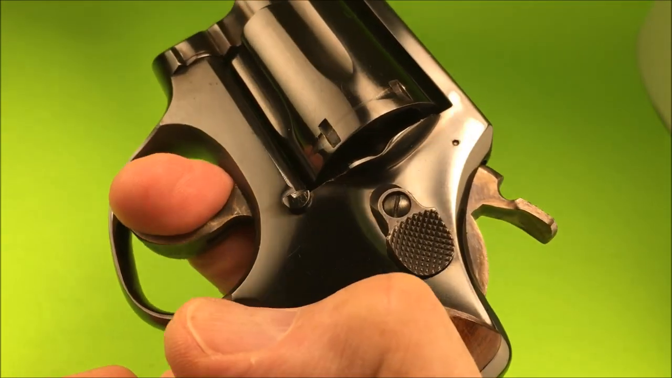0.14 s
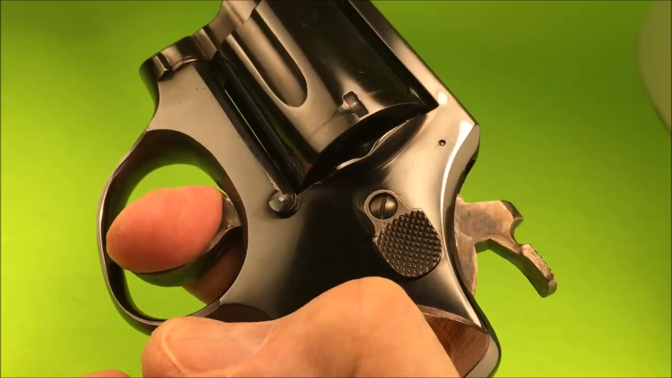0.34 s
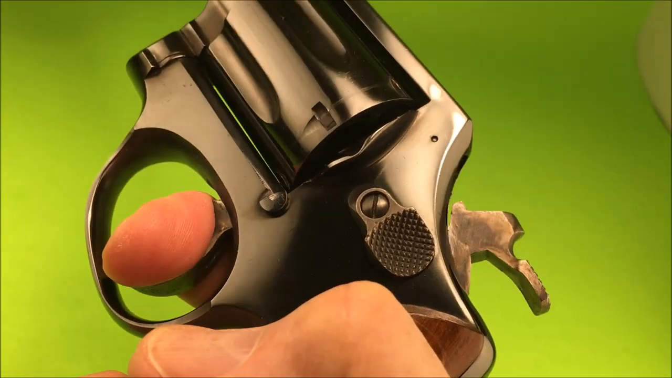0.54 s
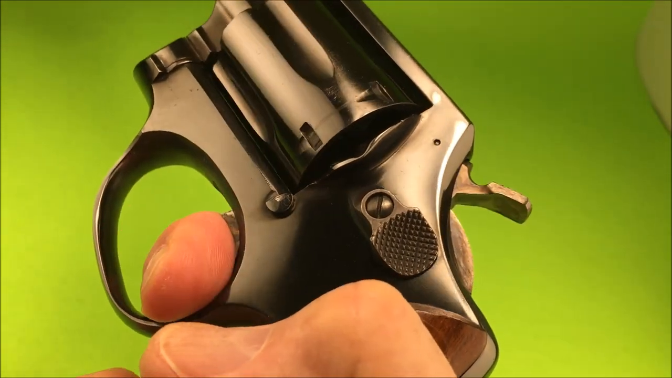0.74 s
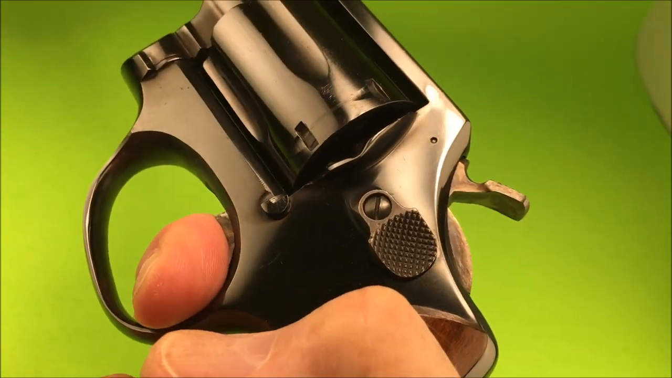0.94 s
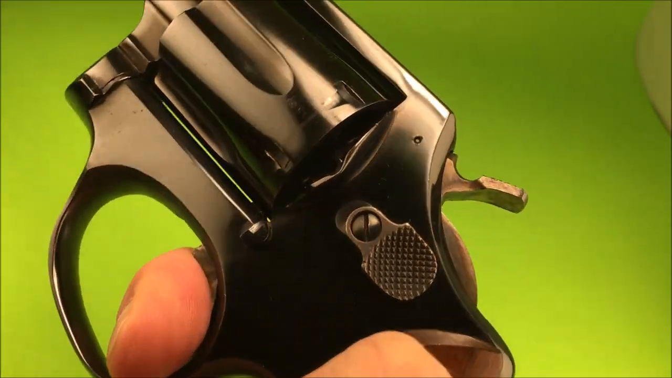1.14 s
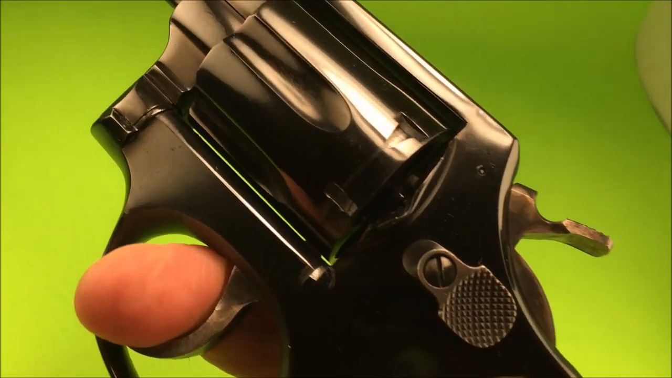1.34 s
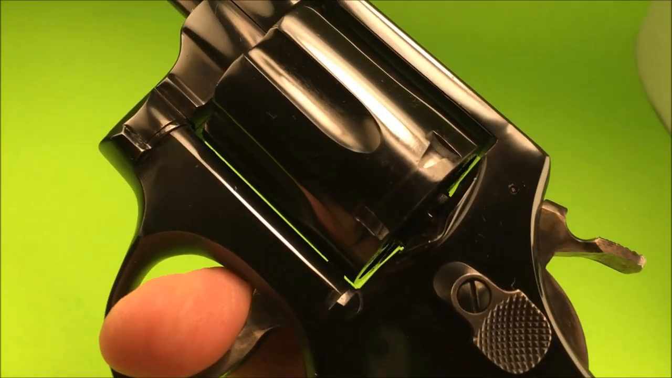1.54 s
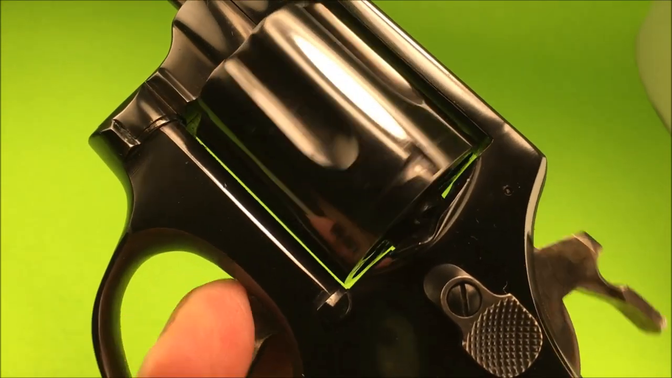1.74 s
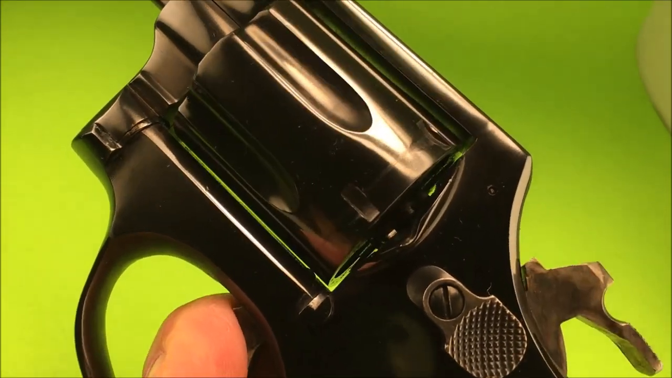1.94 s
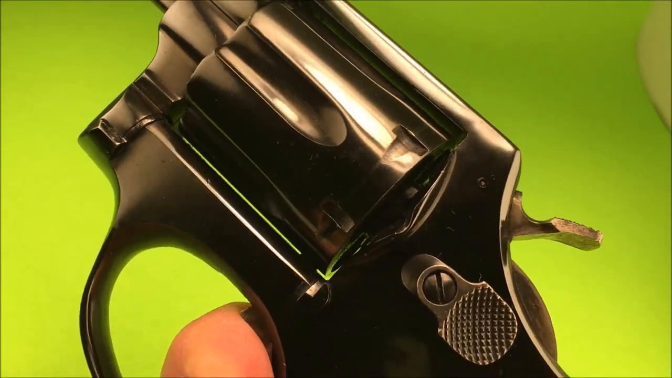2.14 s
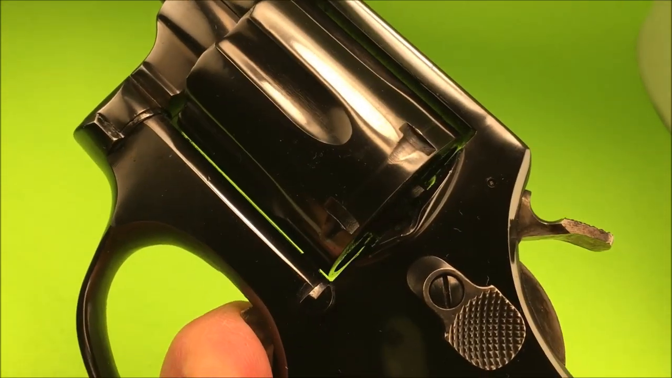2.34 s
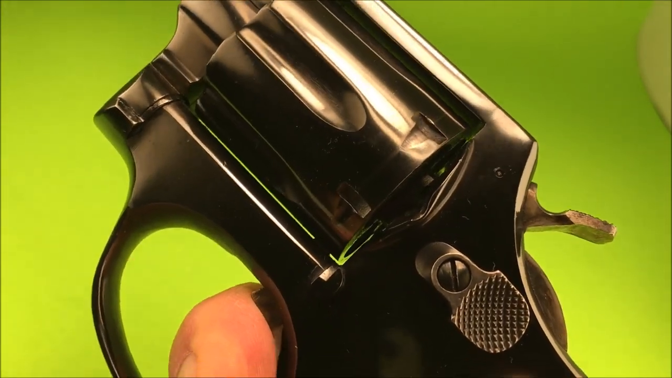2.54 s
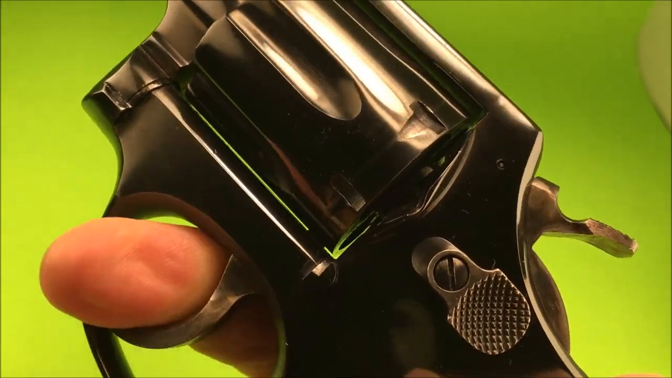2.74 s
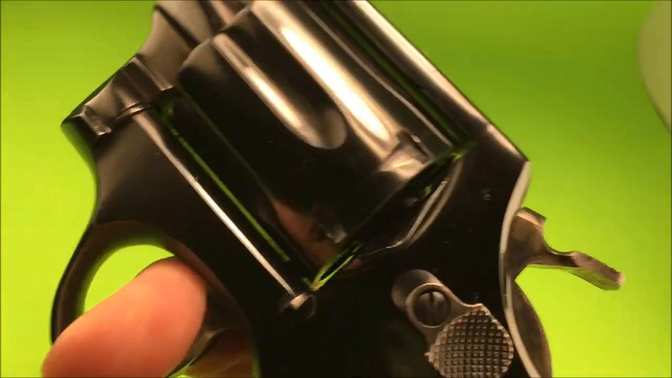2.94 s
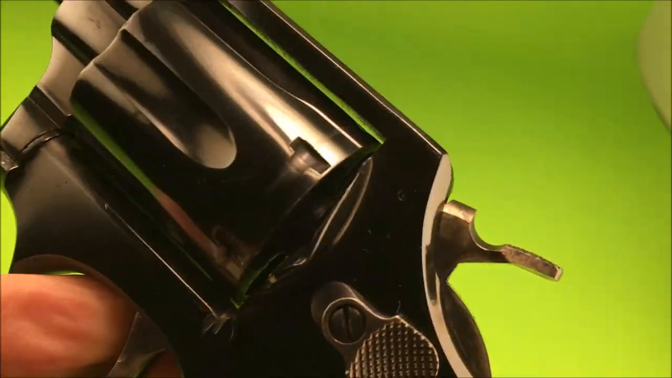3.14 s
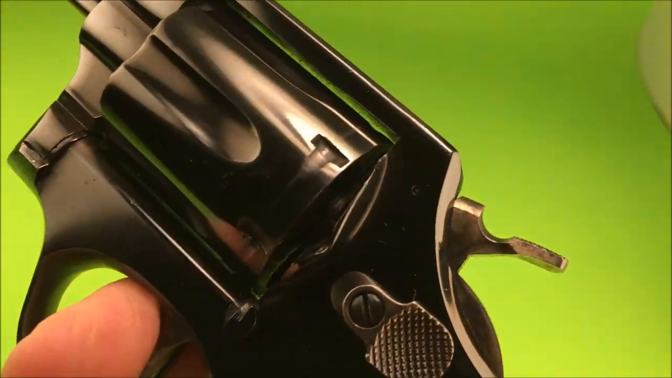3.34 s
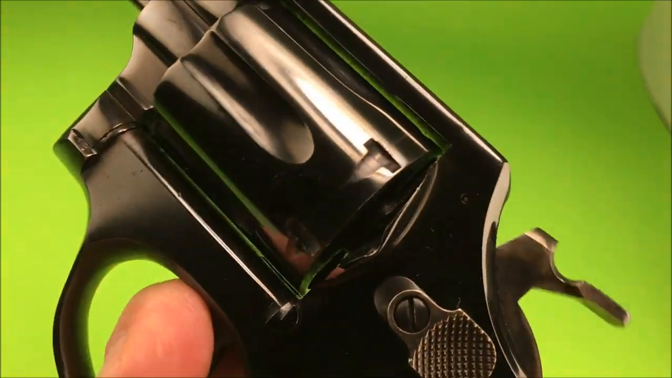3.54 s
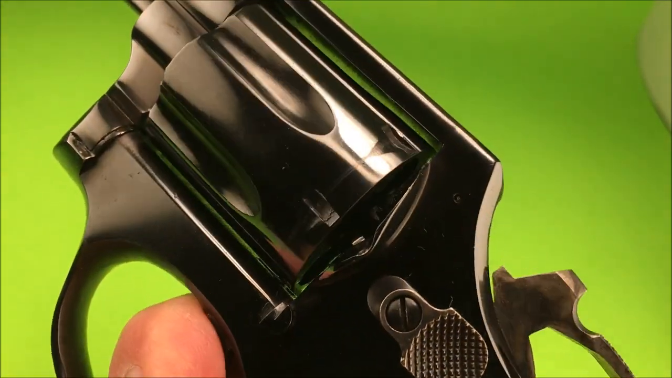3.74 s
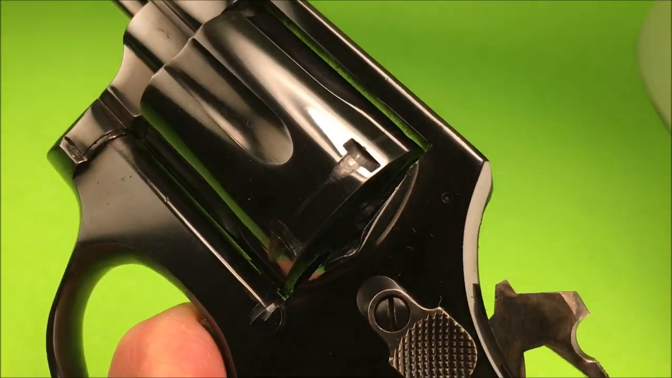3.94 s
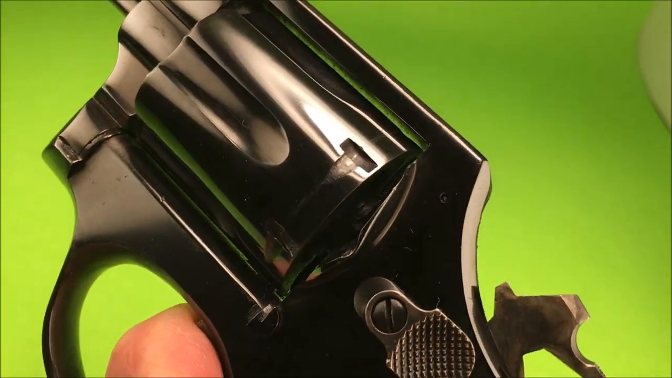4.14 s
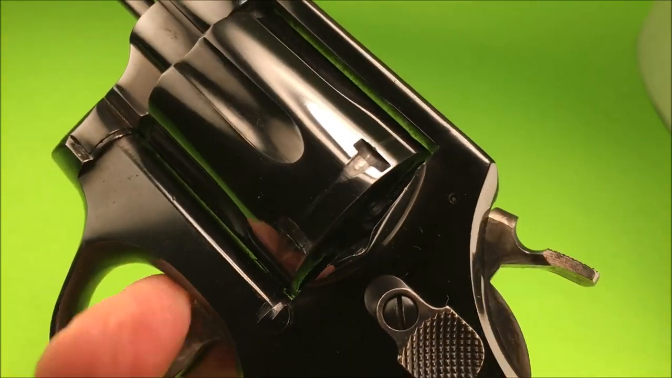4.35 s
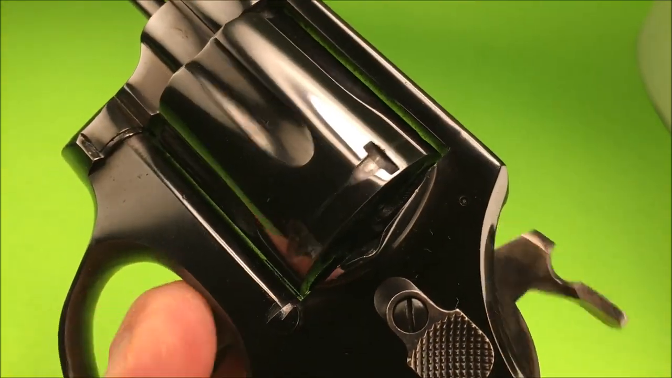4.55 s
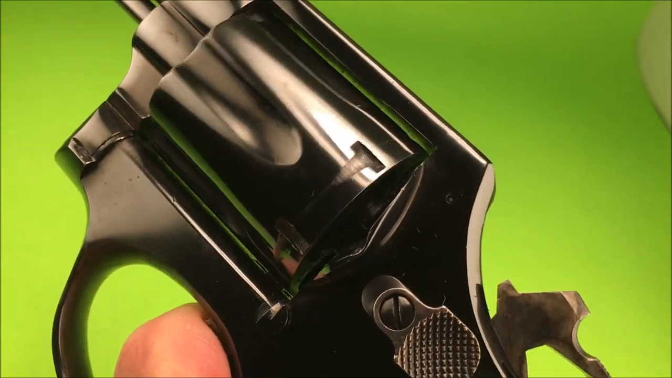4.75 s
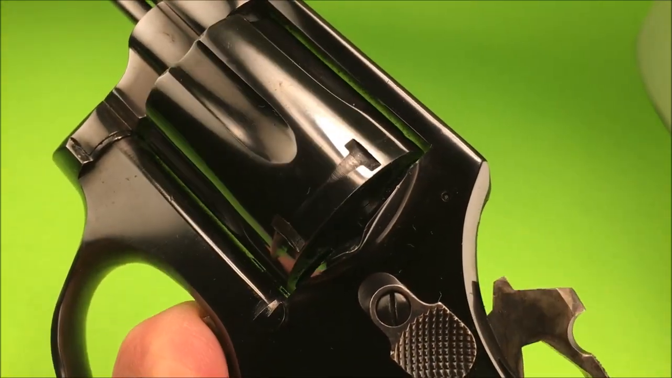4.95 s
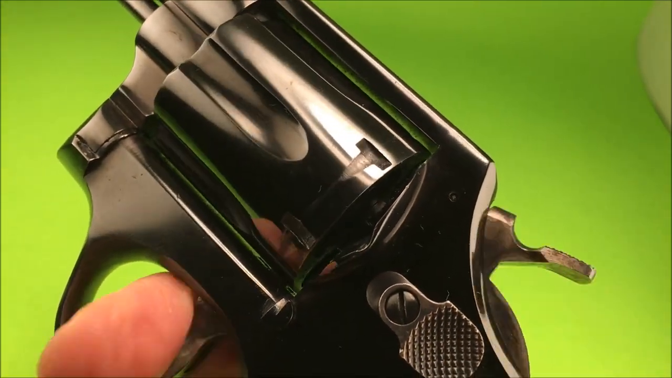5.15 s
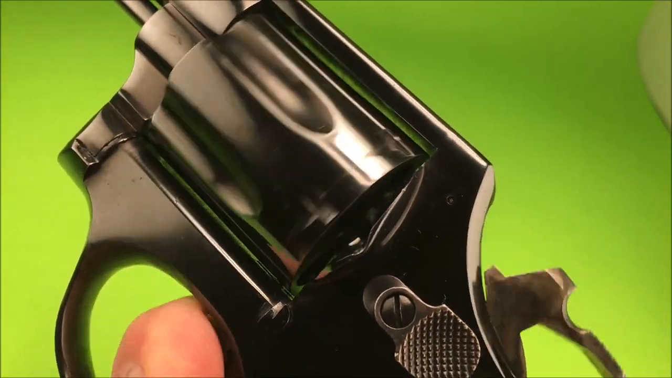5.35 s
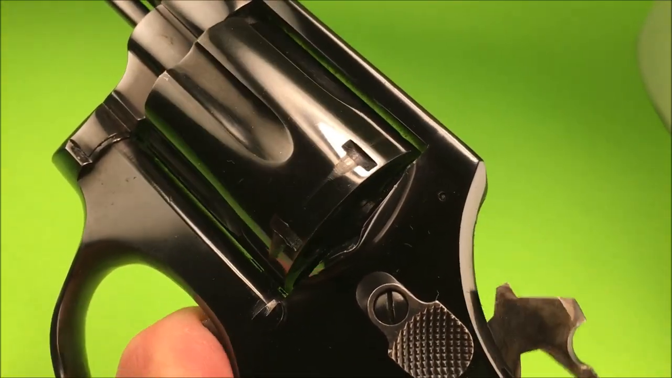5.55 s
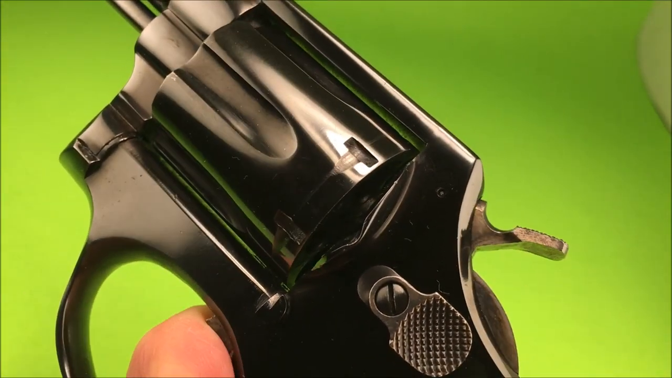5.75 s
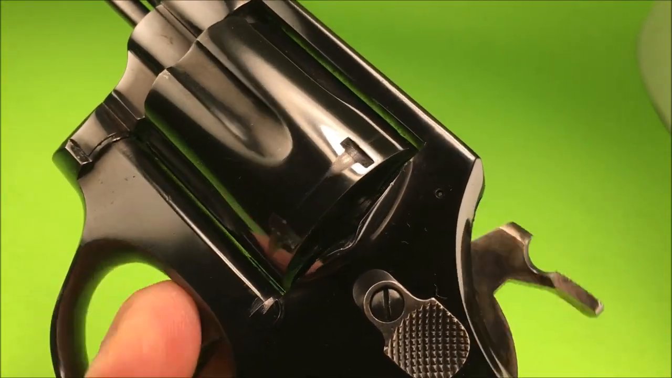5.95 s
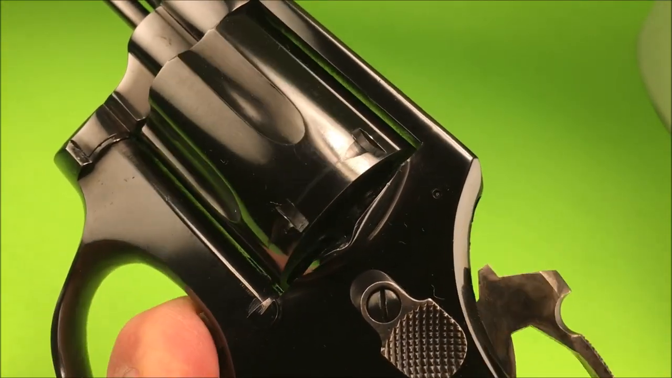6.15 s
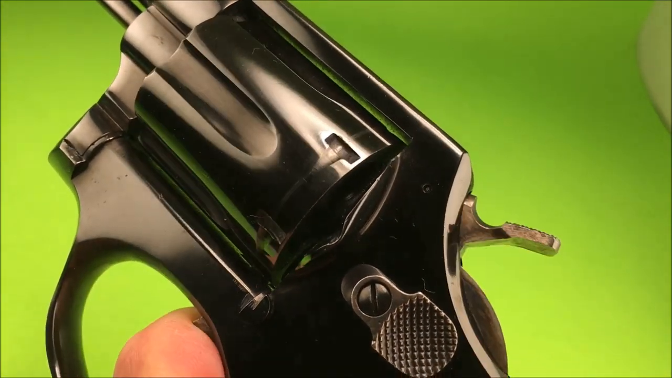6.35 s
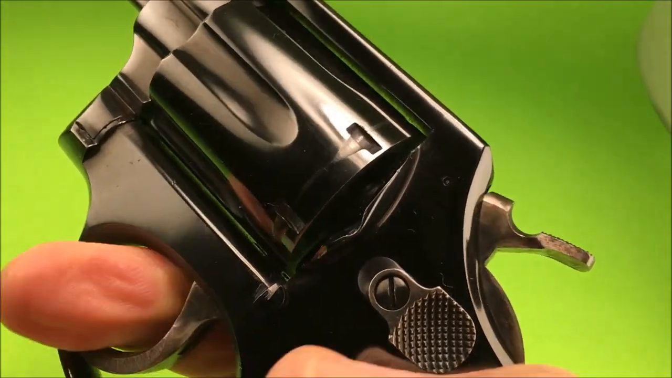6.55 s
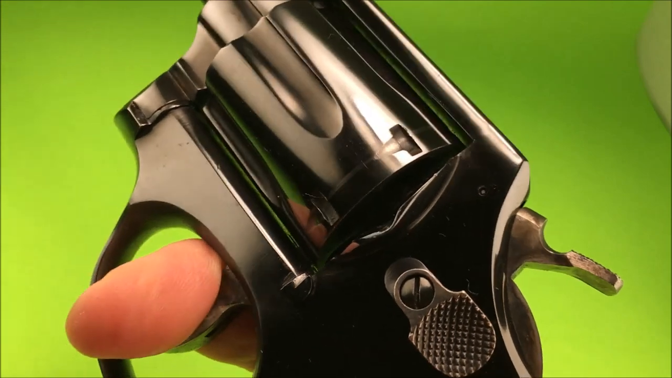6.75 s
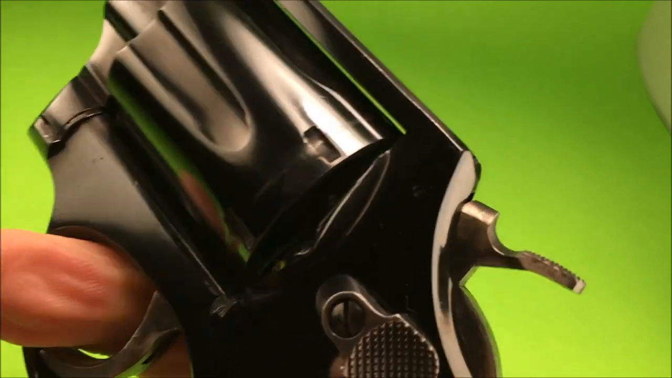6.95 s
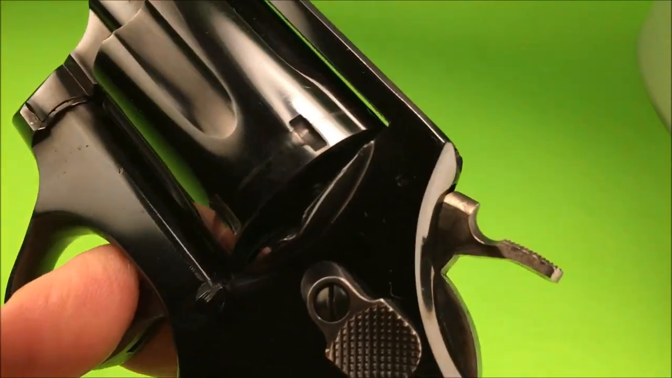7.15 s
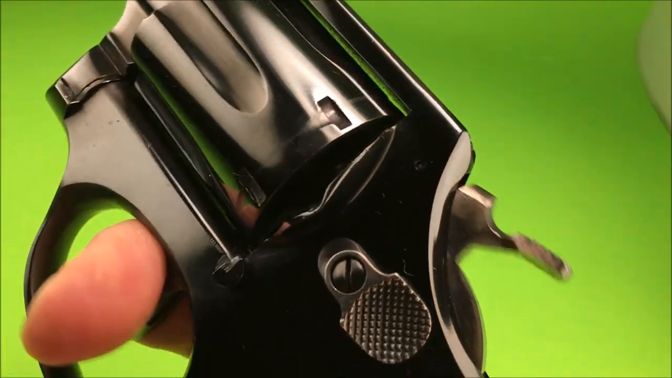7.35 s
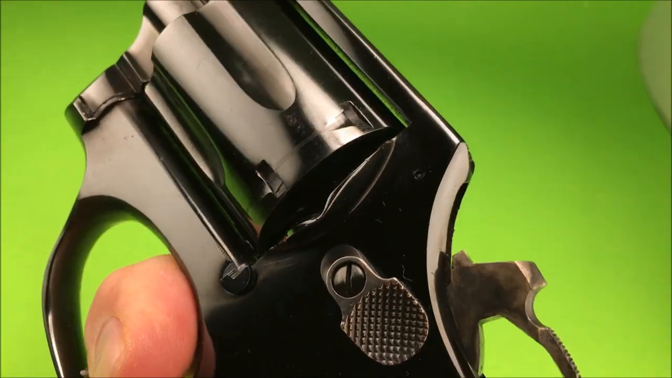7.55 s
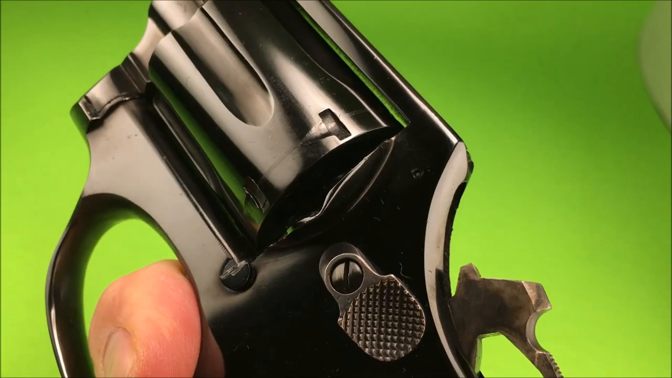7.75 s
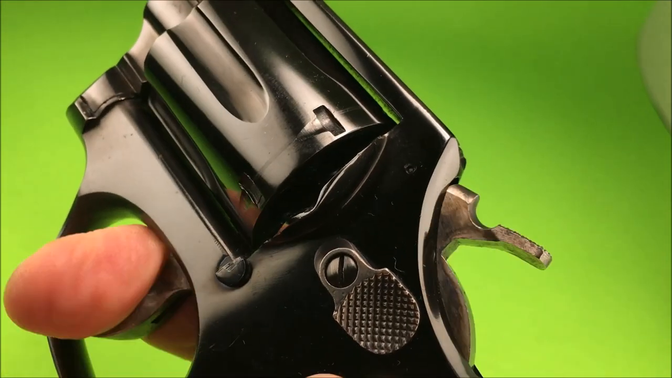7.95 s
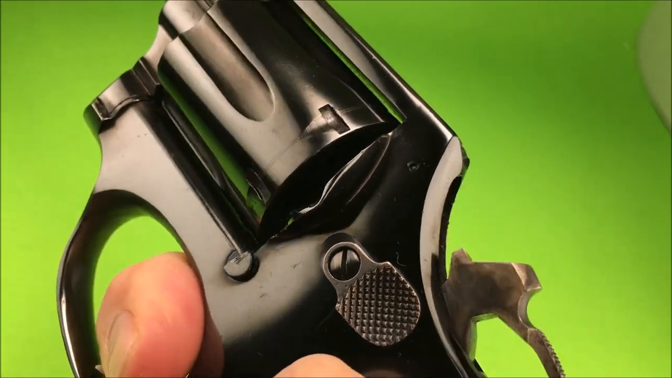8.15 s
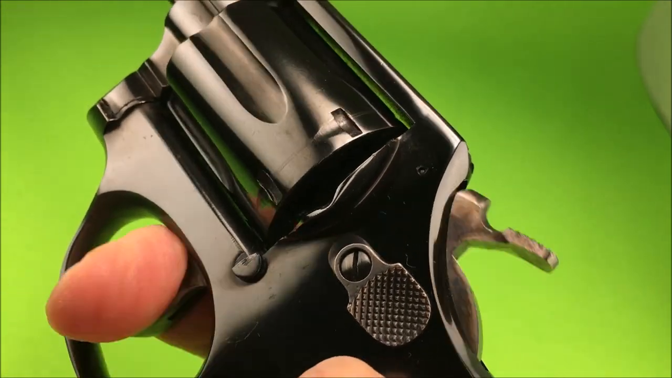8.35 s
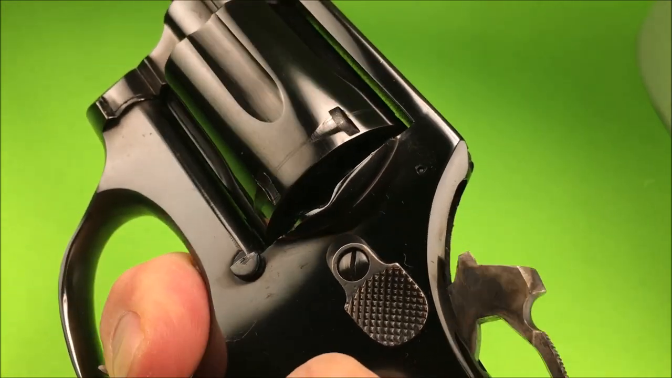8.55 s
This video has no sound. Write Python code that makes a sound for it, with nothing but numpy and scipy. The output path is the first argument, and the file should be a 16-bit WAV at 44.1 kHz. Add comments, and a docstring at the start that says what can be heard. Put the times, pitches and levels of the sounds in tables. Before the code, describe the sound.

A revolver is handled very close to the microphone in a small room with faint low rumble and softer hiss. Small rubs and ticks precede a loud hammer snap at 0.8 s: a tight chattering metallic crack, a low thump in the hand and short ringing. The trigger snaps home at 1.4 s with a sharp double click. A cylinder tick and scrape lead to another hard fall at 2.2 s, then a return at 2.7 s. Faint rubbing follows; the hammer catches with clicks at 4.0 and 4.9 s, with trigger returns at 4.5 and 5.3 s. Loud falls strike at 5.7 and 6.4 s, each answered by a quick return click about 0.2 s later. Quiet handling ticks fill about 6.8 to 7.2 s. A softer catch clicks at 7.7 s, returns click at 8.0 and 8.5 s, and a final firm catch comes at 8.6 s.

```python
"""In a small room, close to a microphone, a revolver is cocked and dry-fired.
Each draw of the hammer ticks and scrapes as the cylinder turns; a sear then catches the hammer with a click,
or it falls, bounces and jolts the gun. The released trigger slides forward and snaps home with a double click.
Steel contacts are short noise bursts plus decaying sine waves; scrapes are noise in tiny uneven steps.
The recorder's limiter ducks after loud blows, and its hiss gate turns the treble down in the pauses."""
import sys
import numpy as np
from scipy import signal
from scipy.fft import rfft, irfft
from scipy.io import wavfile
from scipy.ndimage import uniform_filter1d, minimum_filter1d

SR = 44100
rng = np.random.default_rng(int(sys.argv[2]) if len(sys.argv) > 2 else 0)


def wav_record(signal):
    """Record a signal, one row per channel, as 16-bit PCM in the file named by sys.argv[1]."""
    frames = np.transpose(np.atleast_2d(signal))
    bounded = np.clip(frames, -1, 1)
    # unit amplitude maps onto the largest positive 16-bit level
    quanta = np.round(bounded * 32767).astype(np.int16)
    wavfile.write(sys.argv[1], SR, quanta)


N = 379260  # length in samples

# Colour of the steady rumble and hiss: [f/Hz, level/dB]
BACKGROUND_COLOUR = [(20, -15), (35, -6.5), (60, 0), (85, -5), (120, 0.5), (220, -4.5), (290, -10.5),
                     (390, -10), (520, -22), (1000, -23.5), (3000, -25), (5000, -27.5), (9000, -30.5),
                     (15500, -32.5)]
# Fingers shift on the gun and parts rub: [start t/s, length t/s, level/dB, spread of the catches/dB]
RUBS = [(0, .08, -63, 0), (0.297, 0.12, -56.5, 3.5), (1.223, 0.185, -60.5, 1), (2.885, .136, -58, 6.5),
        (3.383, 0.39, -67, 3), (6.794, 0.23, -60.5, 8), (7.178, 0.22, -64.5, 5), (8.097, 0.2, -57, 4)]
# Single light touches: parts shifting in the hand, and at 0.766, 2.1455 and 6.3515 s the cylinder stop touching
# just before it locks for a fall: [t/s, level/dB, treble relative to level/dB]
LIGHT_TOUCHES = [(0.5263, -52, 1.5), (0.5751, -50, -2), (0.766, -37.5, 2.5), (1.3741, -37.5, 1.5),
                 (1.696, -50.5, -19), (1.992, -55, -11), (2.1455, -33, 2.5), (2.6995, -36, 8),
                 (2.9293, -51, -16), (2.987, -45.5, -12), (3.141, -44.5, -3), (3.162, -37.5, -7),
                 (3.202, -55.5, 2), (4.597, -33, -3), (4.755, -45.5, 1.5), (5.3482, -43, -7.5),
                 (5.8971, -29.5, 3), (6.017, -32, 0.5), (6.3515, -36, -9.5), (6.92, -47.5, -16),
                 (6.979, -35.5, -11.5), (7.191, -39.5, -9), (7.9989, -42, 11), (8.1164, -34.5, -2),
                 (8.2304, -32, -17), (8.2412, -29.5, 5.5)]
# The hammer is drawn; the cylinder stop drops, the cylinder turns, the stop springs back onto it:
# [t/s, drop level/dB, spring-back delay t/s, spring-back level/dB, scrape level/dB]
DRAWS = [(0.379, -51, .0592, -45, -73), (1.8337, -34, 0.05, -39.5, -57.5),
         (3.6542, -35.5, 0.053, -49, -55.5), (4.6551, -36, 0.05, -50.5, -56),
         (5.406, -37.5, .0503, -41, -56), (6.0659, -26, 0.044, -44.5, -50),
         (7.495, -35.5, .0396, -45, -51.5), (8.1545, -27.5, 0.04, -39.5, -52),
         (8.5272, -33.5, 0.037, -46, -50.5)]
# The cylinder locks, then the hammer falls and jolts the gun:
# [strike t/s, strike level/dB, treble relative to strike/dB, first rebound gap t/s, lock lead t/s,
#  lock level/dB, jolt lag t/s, swing level/dB, swing pitch factor/1, knock level/dB]
FALLS = [(0.7851, -4, -0.5, .0052, 0.014, -31.5, 0.0013, 8, 1.01, 1.5),
         (2.167, -3.5, -1, 0.0047, 0.013, -26, 0.00014, 9, 0.98, 1),
         (5.6869, -6, 1, .0036, 0.04, -27, -0.0029, 12, 1.02, -3),
         (6.3927, -5, -1, 0.0037, 0.034, -29.5, -0.0015, 9, 1.06, -6)]
# The trigger slides forward, trips a latch and snaps home:
# [snap t/s, snap level/dB, bass relative to snap/dB, latch lead t/s, latch level/dB, travel t/s, slide level/dB]
RETURNS = [(1.4391, -18.5, -12, 0.022, -21, 0.048, -42.5), (2.7489, -16, -4, 0.007, -18.5, 0.028, -37),
           (4.4598, -13, -18, .0048, -22, .031, -37), (5.2571, -18.5, -12.5, .0042, -15, 0.014, -27),
           (5.9395, -11.5, -15.5, 0.0052, -14, 0.023, -34), (6.5975, -15, -14, 0.0073, -22.5, 0.028, -39),
           (8.0199, -21.5, -16, 0.0091, -18, 0.039, -38), (8.4615, -19.5, -9.5, 0.0088, -43, 0.027, -44)]
# The sear catches the drawn hammer: [t/s, level/dB, bass relative to level/dB]
SEAR_CATCHES = [(3.954, -17.5, -5), (4.8682, -20, -16.5), (7.74, -26, -16.5), (8.5935, -15.5, -3.5)]
# Tones at which the steel frame vibrates: [f/Hz, level/dB]
FRAME_MODES = [(1206, -5.5), (1981, -1.5), (2771, -15.5), (3139, -4.5), (3423, -5), (3740, 3), (4300, 1.5),
               (4619, -5.5), (5166, 1.5), (5749, -0.5), (6331, 2), (7050, 1), (7537, -7), (7957, -6),
               (8800, 0.5), (9430, 2.5), (10523, -7.5), (10850, -6), (11445, -5.5), (11800, -6),
               (13038, -9.5), (14600, -10.5)]
# Groups of tones that ring on in frame and mainspring: [f/Hz, width f/Hz, level/dB]
RING_CLUSTERS = [(1200, 150, -10.5), (2260, 91, 1.5), (3270, 150, 0), (3700, 240, 0.5), (6800, 400, 2.5),
                 (8400, 900, -1.5), (11100, 320, 2.5), (14000, 1100, -3)]
# Hollow tones of the grip in the hand: [f/Hz, level/dB, 60 dB decay t/s]
GRIP_MODES = [(167, 0.5, 0.04), (388, -1, .025), (517, 0, 0.03), (626, -6, 0.042), (1037, -9, .02)]
# Colour of the room's echo: [f/Hz, level/dB]
ECHO_COLOUR = [(130, 5.5), (260, 4.5), (500, -12.5), (900, -13.5), (1300, -4), (2200, -1.5), (3000, -2),
               (4200, -1), (5500, -2.5), (8500, -2), (12000, -8), (16000, -11)]
# Tone of each kind of contact, as named settings for click():
# [t60 and bass_t60: decay t/s, thud_db: level/dB, thud_hz: lowest thud f/Hz, edge_hz: lower edge of the middle f/Hz]
HAMMER_TONE = dict(t60=0.018, bass_t60=0.031, thud_db=-17.5, thud_hz=166, edge_hz=2300)
SEAR_TONE = dict(t60=0.021, bass_t60=0.014, thud_db=-7.5, thud_hz=214, edge_hz=1820)
LOCK_TONE = dict(t60=0.019, bass_t60=0.011, thud_db=-15, thud_hz=200, edge_hz=1900)
TICK_TONE = dict(t60=0.015, bass_t60=0.018, thud_db=-32.5, thud_hz=200, edge_hz=1800)

BACKGROUND_DB = -55
BASS_EDGE_HZ, TREBLE_EDGE_HZ, TOP_HZ = 1400, 5500, 15900
ATTACK = int(.0025 * SR)  # samples over which a level is taken
AGE = np.arange(SR // 4) / SR  # seconds since a sound began
THUD_T60_S = .035
# each rebound of the hammer comes sooner, weaker and brighter
REBOUND_RATIO, REBOUND_LOSS_DB, REBOUND_BRIGHTER_DB = .88, 1, 1


def undb(db):
    """Turn decibels into a plain multiplier."""
    return 10 ** (np.asarray(db) / 20)


def rms(x):
    """Give the average strength of a sound (root mean square)."""
    return np.sqrt(np.mean(x ** 2))


def fade(t, t60):
    """Die away freely, 60 dB down after t60 seconds."""
    return np.exp(-np.log(1000) * t / t60)


def add(track, s, sound):
    """Mix a sound into the track at time s, in seconds."""
    i = max(int(s * SR), 0)
    track[i:i + len(sound)] += sound[:max(N - i, 0)]


def band(x, hz, kind, order=3):
    """Keep only part of the pitch range, with a Butterworth filter."""
    return signal.sosfilt(signal.butter(order, hz, kind, fs=SR, output="sos"), x)


def coloured(points, size):
    """Make noise of unit strength whose spectrum follows (Hz, dB) points."""
    hz, db = np.transpose(points)
    f = np.maximum(np.fft.rfftfreq(size, 1 / SR), 1)
    gain = undb(np.interp(np.log(f), np.log(hz), db))
    x = irfft(rfft(rng.standard_normal(size)) * gain, size)
    return x / rms(x)


def frame_modes(t, detune):
    """The frame's tones sound together, each contact feeding them differently and shifting them a little."""
    hz, mode_levels = np.transpose(FRAME_MODES)
    weight = undb(mode_levels) * rng.rayleigh(size=len(hz))
    phase = rng.uniform(0, 2 * np.pi, len(hz))
    hz = hz * (1 + detune * rng.standard_normal(len(hz)))
    modes = weight @ np.sin(2 * np.pi * hz[:, None] * t + phase[:, None])
    return modes / rms(modes)


def click(db, bass_db, treble_db, t60, bass_t60, thud_db, thud_hz, edge_hz, mode_t60=0.041, mode_db=-7.0,
          crack_t60=0.0017, crack_db=1, detune=0.022, ripple_db=3):
    """Steel meets steel: a crack, a short rattle and the frame's tones, damped by the hand, over a soft thud."""
    t = AGE[:len(AGE) // 3]
    modes = frame_modes(t, detune)
    # an uneven spectrum makes every rattle different
    knots = np.geomspace(BASS_EDGE_HZ, TOP_HZ, 28)
    ripple = ripple_db * rng.standard_normal(len(knots))
    dense = coloured(np.column_stack([knots, ripple]), len(t))
    rattle = dense * (fade(t, t60) + undb(crack_db) * fade(t, crack_t60))
    steel = rattle + undb(mode_db) * modes * fade(t, mode_t60)

    bass = band(dense * fade(t, bass_t60), BASS_EDGE_HZ, "low")
    # small parts radiate little below edge_hz
    middle = band(steel, [edge_hz, TREBLE_EDGE_HZ], "band")
    treble = band(steel, [TREBLE_EDGE_HZ, TOP_HZ], "band", order=2)
    thud_pitch = thud_hz * rng.uniform(1.0, 1.2)
    sound = undb(thud_db) * np.sin(2 * np.pi * thud_pitch * t) * fade(t, THUD_T60_S)
    for part, relative_db in ((bass, bass_db), (middle, 0), (treble, treble_db)):
        sound = sound + undb(relative_db) * part / rms(part[:ATTACK])
    return undb(db) * sound


def tick(db, treble_db, bass_db=-15):
    """A small part touches lightly, with the steel contact's crack, rattle and tones."""
    return click(db, bass_db, treble_db, **TICK_TONE)


def scrape(length_s, db, taper, swell_db=0, catch_rate=260, spread_db=3.8, grain_t60=0.0081, drag=0.28,
           low_hz=1600, high_hz=4000):
    """Sliding steel drags softly and slips in tiny uneven steps; its level drifts by swell_db on the way."""
    size = SR // 2
    caught = rng.random(size) < catch_rate / SR  # catch_rate is per second
    catches = caught * undb(spread_db * np.minimum(rng.exponential(size=size), 3.5))
    pressure = drag + signal.fftconvolve(catches, fade(AGE, grain_t60))[:size]
    grit = band(pressure * rng.standard_normal(size), low_hz, "high")
    grit = band(grit, high_hz, "low", order=1)
    piece = grit[:int(length_s * SR)]
    piece = piece * undb(np.linspace(0, swell_db, len(piece)))
    # taper is the share of the length spent fading in and out
    return undb(db) * piece / rms(piece) * signal.windows.tukey(len(piece), taper)


def tail(x, colour, t60, build_s):
    """Each blow's energy builds up and dies away as coloured noise, spread over countless tones."""
    t = np.arange(SR) / SR
    decay = (fade(t, t60) * (1 - np.exp(-t / build_s))) ** 2
    energy = np.maximum(signal.fftconvolve(x ** 2, decay / decay.sum())[:N], 0)
    return np.sqrt(energy) * coloured(colour, N)


def room_background():
    """The room's steady rumble and hiss, as coloured noise."""
    return undb(BACKGROUND_DB) * coloured(BACKGROUND_COLOUR, N)


def handling():
    """Parts rub as noisy scrapes and touch as light ticks; a few ticks are the cylinder stop touching before a
    fall."""
    track = np.zeros(N)
    for s, length, db, spread_db in RUBS:
        add(track, s, scrape(length, db, taper=0.3, catch_rate=240, spread_db=spread_db,
                             grain_t60=0.012, drag=0.47, low_hz=1600, high_hz=3000))
    for s, db, treble_db in LIGHT_TOUCHES:
        add(track, s, tick(db, treble_db))
    return track


def cylinder_turns(drop_treble_db=-1, back_treble_db=1, early_s=.012, overrun=1.75):
    """The cylinder stop drops and springs back with two ticks, while the cylinder scrapes round under them."""
    track = np.zeros(N)
    for s, drop_db, delay, back_db, scrape_db in DRAWS:
        add(track, s, tick(drop_db, drop_treble_db))
        # the scrape starts before the first tick and outlasts the second
        turn_s = early_s + delay * overrun
        add(track, s - early_s, scrape(turn_s, scrape_db, taper=0.14, swell_db=-6, catch_rate=400, drag=.7))
        add(track, s + delay, tick(back_db, back_treble_db))
    return track


def grip_jolts(rest_hz=42, extra_hz=160, glide_s=0.006, swell_peak_s=0.0141, judder_db=-27, judder_s=0.018,
               judder_hz=550):
    """The hammer judders as it flies; then the grip knocks and the gun swings in the hand, sinking in pitch."""
    # the swing starts extra_hz above rest_hz; each fall then scales both by its pitch factor
    turns = rest_hz * AGE + extra_hz * glide_s * (1 - np.exp(-AGE / glide_s))
    swell = (AGE / swell_peak_s * np.exp(1 - AGE / swell_peak_s)) ** 3
    knock = np.zeros(len(AGE))
    for k, (hz, mode_db, t60) in enumerate(GRIP_MODES):
        sign = (-1) ** k  # neighbouring tones start in opposite directions
        knock += sign * undb(mode_db) * np.sin(2 * np.pi * hz * AGE) * fade(AGE, t60)
    track = np.zeros(N)
    for s, *_, lag, swing_db, pitch, knock_db in FALLS:
        judder = band(rng.standard_normal(len(AGE)), [judder_hz / 4, judder_hz], "band", order=2)
        judder = judder[-int(judder_s * SR):]
        rise = np.linspace(.5, 1, len(judder))
        add(track, s + lag - judder_s, undb(judder_db) * judder / rms(judder) * rise)
        swing = undb(swing_db) * swell * np.sin(2 * np.pi * pitch * turns)
        add(track, s + lag, undb(knock_db) * knock - swing)
    return track


def cylinder_locks(bass_db=-14, treble_db=8, flight_db=-33):
    """The stop clicks into its notch before each fall; the hammer then scrapes, ever louder, on its way down."""
    track = np.zeros(N)
    for s, _, _, _, lead, lock_db, *_ in FALLS:
        add(track, s - lead, click(lock_db, bass_db, treble_db, **LOCK_TONE))
        add(track, s - lead, scrape(lead, flight_db, taper=0.073, swell_db=14))
    return track


def hammer_strikes(count=5, bass_db=-9):
    """The hammer hits the frame and chatters to rest in a run of closer, weaker, brighter contacts."""
    track = np.zeros(N)
    for s, db, treble_db, gap, *_ in FALLS:
        for k in range(count):
            level_db = db - k * REBOUND_LOSS_DB
            brightness_db = treble_db + k * REBOUND_BRIGHTER_DB
            add(track, s, click(level_db, bass_db, brightness_db, **HAMMER_TONE))
            s += gap * REBOUND_RATIO ** k
    return track


def ring_colour(clusters):
    """Groups of long-ringing tones add up to a spectrum with one rounded peak each."""
    f = np.geomspace(100, TOP_HZ, 400)
    power = sum(undb(db) ** 2 / (1 + (2 * (f - hz) / width) ** 2) for hz, width, db in clusters)
    return np.column_stack([f, 10 * np.log10(power)])


def frame_rings(hammer, low_db=-25.0, high_db=-18.5):
    """The frame rings on after a fall, its low tones longest."""
    low_clusters = [row for row in RING_CLUSTERS if row[0] < TREBLE_EDGE_HZ]
    high_clusters = [row for row in RING_CLUSTERS if row[0] >= TREBLE_EDGE_HZ]
    low = undb(low_db) * tail(hammer, ring_colour(low_clusters), t60=0.34, build_s=0.0044)
    high = undb(high_db) * tail(hammer, ring_colour(high_clusters), t60=0.27, build_s=0.0076)
    return low + high


def trigger_returns(start_db=-42, start_treble_db=4, latch_bass_db=-15, latch_treble_db=6, snap_treble_db=6):
    """The trigger breaks free with a tick, slides with a growing scrape, trips the latch and hits its stop."""
    track = np.zeros(N)
    for s, snap_db, bass_db, lead, latch_db, travel, slide_db in RETURNS:
        add(track, s - travel, tick(start_db, start_treble_db))
        add(track, s - travel, scrape(travel, slide_db, taper=.12, swell_db=19, high_hz=6000))
        add(track, s - lead, click(latch_db, latch_bass_db, latch_treble_db, **LOCK_TONE))
        add(track, s, click(snap_db, bass_db, snap_treble_db, **LOCK_TONE))
    return track


def sear_catches(treble_db=4, ride_s=0.0087, ride_db=-29):
    """The sear scrapes over the edge of the notch and drops in with a click."""
    track = np.zeros(N)
    for s, db, bass_db in SEAR_CATCHES:
        add(track, s - ride_s, scrape(ride_s, db + ride_db, taper=0.25))
        add(track, s, click(db, bass_db, treble_db, **SEAR_TONE))
    return track


def mainspring_sings(sear, level_db=-27, hz=4350, width_hz=600):
    """The tensioned mainspring sings in one narrow range when the sear catches."""
    return undb(level_db) * tail(sear, ring_colour([(hz, width_hz, 0)]), t60=0.24, build_s=.003)


def echoes(gun, near_db=-18, room_db=-26):
    """Table and walls send the sound back as a short and a longer tail of noise."""
    near = undb(near_db) * tail(gun, ECHO_COLOUR, t60=0.028, build_s=0.00061)
    room = undb(room_db) * tail(gun, ECHO_COLOUR, t60=0.37, build_s=0.0079)
    return near + room


def scene():
    """The gun's moving parts, their ringing and echoes add up over the room's background."""
    background = room_background()
    hammer = hammer_strikes()
    sear = sear_catches()
    gun = handling() + cylinder_turns() + cylinder_locks() + hammer + trigger_returns() + sear
    ringing = frame_rings(hammer) + mainspring_sings(sear)
    return (background + gun + grip_jolts() + ringing + echoes(gun))[None]


def limiter(x, ceiling_db=-7, release_db_per_s=25):
    """The gain drops just ahead of a loud blow and creeps back up."""
    level_db = 10 * np.log10(np.maximum(uniform_filter1d(x ** 2, ATTACK), 1e-12))
    recovery = release_db_per_s * np.arange(N) / SR
    excess_db = np.maximum(level_db - ceiling_db, 0)
    cut_db = np.maximum.accumulate(excess_db + recovery) - recovery
    early_cut_db = np.pad(cut_db[ATTACK // 2:], (0, ATTACK // 2), "edge")
    return x * undb(-early_cut_db)


def hiss_gate(x, split_hz=1400, hold_db=-28, hold_s=0.463, pass_db=-56, shut_db=-10, ease_s=.04):
    """Faint treble is turned down; small ticks slip through, and a loud click holds the gate open for a while."""
    low = signal.sosfiltfilt(signal.butter(4, split_hz, fs=SR, output="sos"), x)
    treble = x - low
    level = np.sqrt(np.maximum(uniform_filter1d(treble ** 2, ATTACK), 1e-14))
    size = int(hold_s * SR)
    quiet = 1. * (level < undb(hold_db))
    held = 1 - minimum_filter1d(quiet, size, origin=(size - 1) // 2)  # looks back over hold_s
    eased = uniform_filter1d(held, int(ease_s * SR))
    slipping_through = np.minimum(level / undb(pass_db), 1) ** 2
    opening = np.maximum(eased, slipping_through)
    return low + np.maximum(opening, undb(shut_db)) * treble


def record(dry, mic_hz=13500):
    """The microphone softens the top; limiter, hiss gate, clipping of the sharpest peaks and a top cut follow."""
    x = band(dry[0], mic_hz, "low", order=2)
    x = np.clip(hiss_gate(limiter(x)), -1, 1)
    top_cut = signal.ellip(10, .2, 90, TOP_HZ, fs=SR, output="sos")
    return signal.sosfilt(top_cut, x)[None]


dry = scene()
out = record(dry)
wav_record(out)
```